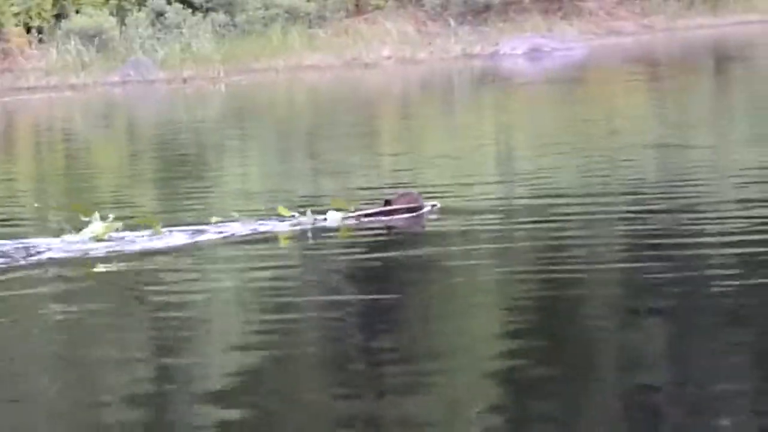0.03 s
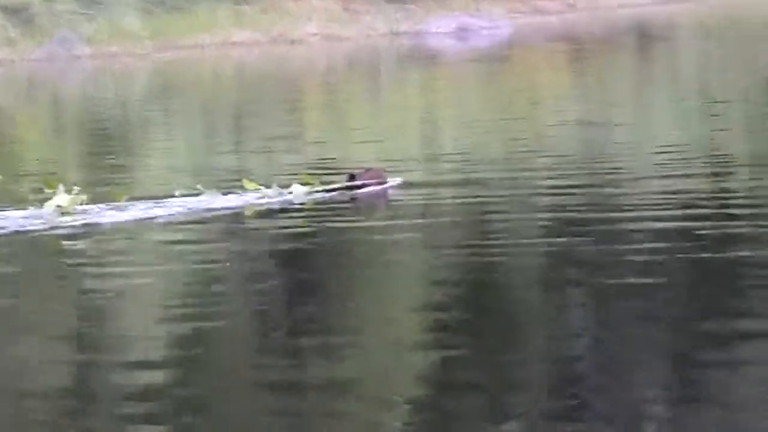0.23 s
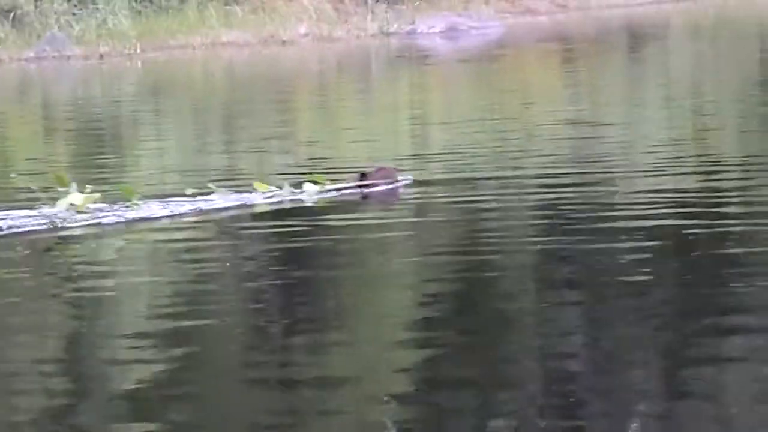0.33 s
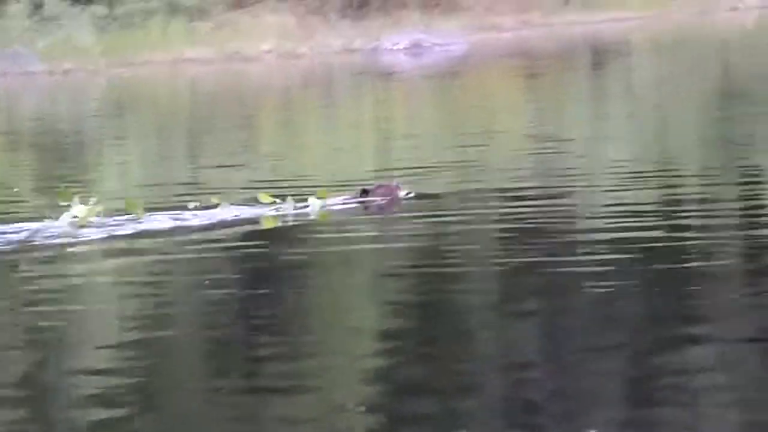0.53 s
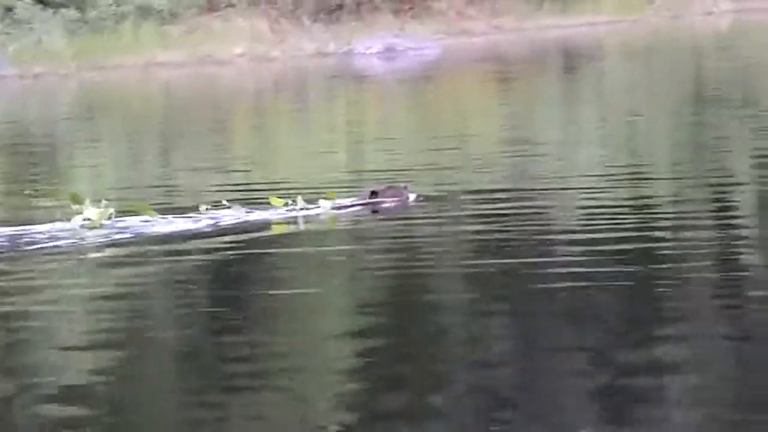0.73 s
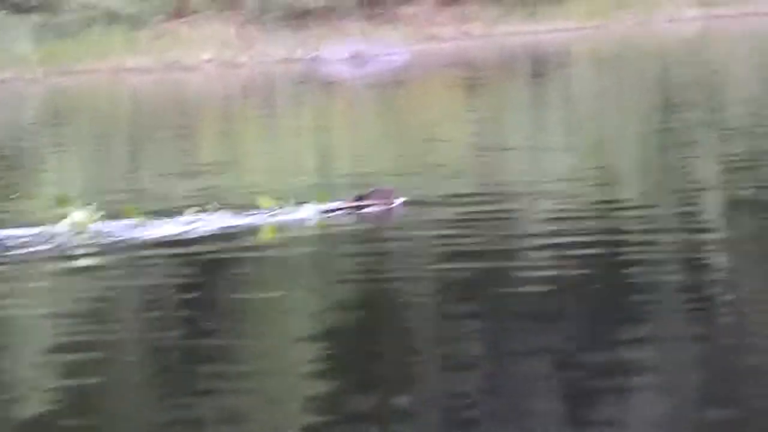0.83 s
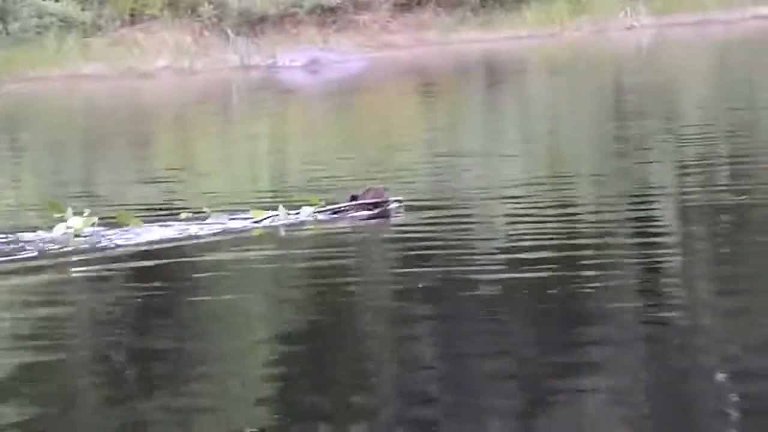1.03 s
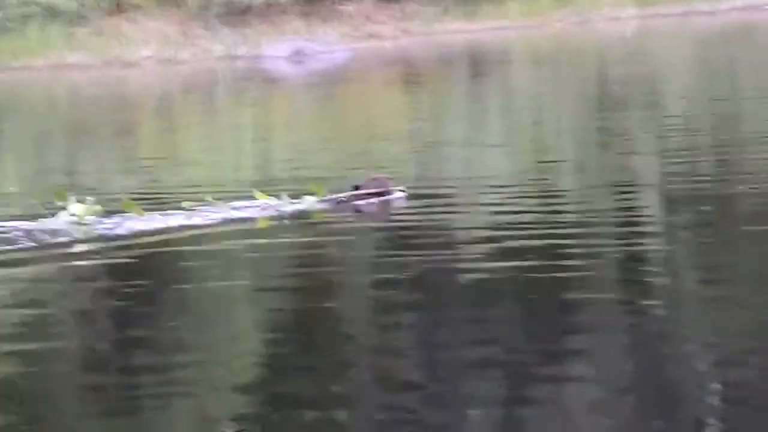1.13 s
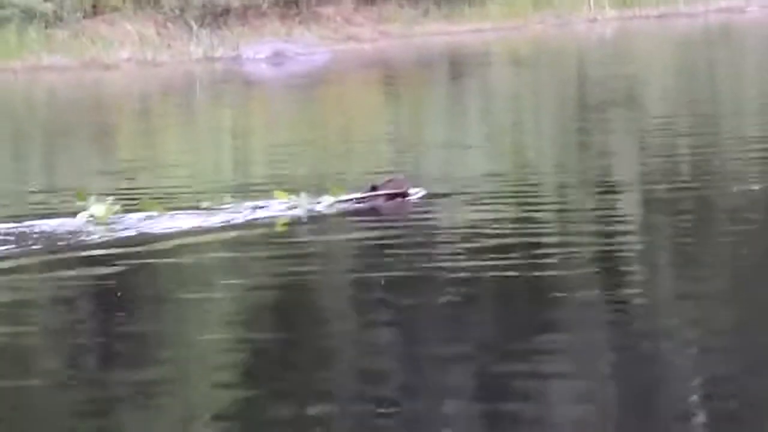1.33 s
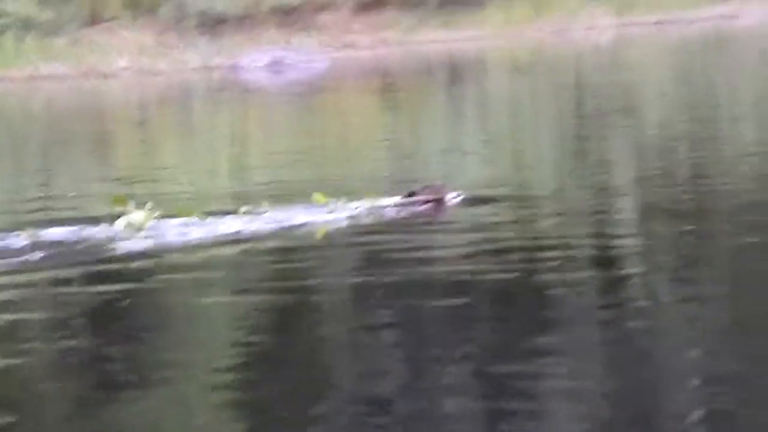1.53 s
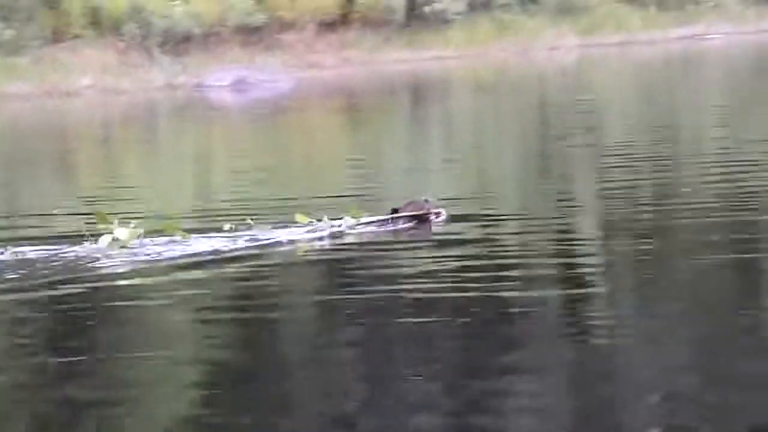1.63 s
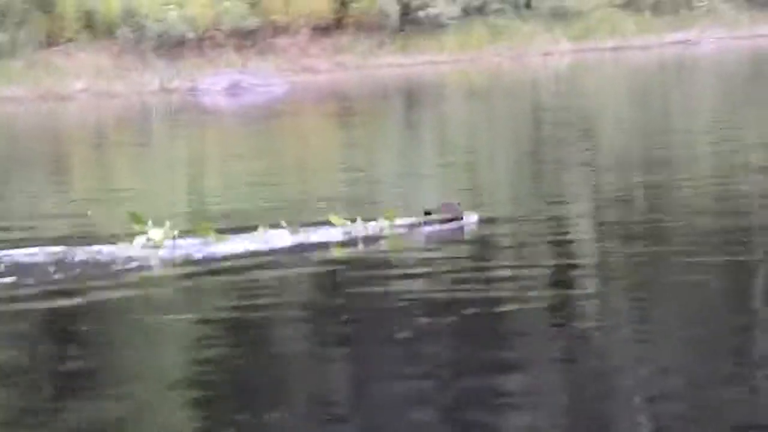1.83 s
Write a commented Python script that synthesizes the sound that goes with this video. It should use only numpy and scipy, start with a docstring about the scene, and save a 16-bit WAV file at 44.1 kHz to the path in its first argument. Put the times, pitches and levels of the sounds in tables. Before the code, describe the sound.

Two quick handling knocks close to the microphone, over soft wind and small regular ticks.

```python
"""A small tick over low wind rumble, then two sharp knocks: a hand-held camera beside a quiet pond.
The knocks and a few soft bumps of the hand thump its body and click its casing. A small mechanism,
probably the focus drive, ticks about 7.5 times a second and rings the lens barrel. Behind it: faint
dull patter, perhaps water, light gusts on the microphone and a steady hiss."""
import sys
import numpy as np
from scipy import signal
from scipy.fft import rfft, irfft
from scipy.io import wavfile

SR = 44100
rng = np.random.default_rng(int(sys.argv[2]) if len(sys.argv) > 2 else 0)


def to_wav(s):
    """Save 16-bit WAV."""
    ch = np.atleast_2d(s).T  # columns
    pcm = np.round(np.clip(ch, -1, 1) * 32767)  # PCM
    wavfile.write(sys.argv[1], SR, pcm.astype(np.int16))


N = 83790

KNOCK_HITS = [(0.2412, -12.5, 0.00072, -35), (0.2874, -14, 0.00069, -36.5)]  # blows on the body: t/s, thump peak/dB, contact/s, rattle level/dB
HAND_BUMPS = [(.169, -32.5, -40.5, 1770, -38.5), (0.2129, -27, -60, 3570, -39),
              (0.263, -26, -40, 3600, -46), (0.5611, -29, -41, 970, -37), (0.893, -30, -36, 960, -41),
              (.9393, -33, -39, 3670, -61), (1.617, -25.5, -38, 900, -42), (1.676, -30, -44, 960, -48.5)]  # soft bumps: t/s, thud peak/dB, clack level/dB, ring f/Hz, ring level/dB
CASING_CLICKS = [(.2128, -42.5, 0.015), (0.2636, -53, 0.0093), (0.2778, -33, 0.0034), (.3134, -43, 0.0036),
                 (1.212, -49, 0.013)]  # creaks: centre t/s, level/dB, length/s
FOCUS_STEPS = [(0.0212, -28.5), (0.1535, -27), (0.2863, -30), (0.4196, -28.5), (0.5523, -29.5),
               (.6858, -28), (.819, -28), (0.9519, -27.5), (1.153, -33), (1.2845, -33.5), (1.418, -34.5),
               (1.5507, -30), (1.683, -30), (1.817, -28)]  # drive stops: t/s, relative level/dB
PATTER_TICKS = [(0.5826, -46.5, 2920), (0.635, -47.5, 4200), (0.6622, -44, 1540), (0.702, -49, 1070),
                (.7645, -53, 2900), (0.901, -47, 930), (0.9185, -52, 2900), (0.9677, -46, 3130),
                (1.066, -54, 2950), (1.268, -50, 2780), (1.376, -45.5, 2640), (1.530, -45.5, 3130),
                (1.627, -46.5, 2970), (1.841, -45, 960)]  # dull ticks: t/s, level/dB, ring f/Hz
WIND_BUFFETS = [(1.299, -30, 0.0037), (1.3172, -29, 0.0026), (1.3315, -32.5, 0.0029),
                (1.357, -34.5, 0.0073), (1.3755, -36, 0.0025), (1.3925, -31.5, 0.0025),
                (1.4395, -31, 0.0057), (1.4645, -37, 0.0021), (1.5165, -32, 0.0025)]  # pressure pulses: t/s, peak/dB, length/s
# resonances: f/Hz, width/Hz, gain/dB
BODY_MODES = [(92.4, 27.6, -3.5), (176, 60, -3), (390, 250, -14)]
RATTLE_MODES = [(3540, 140, -4), (3870, 290, -18)]
BARREL_MODES = [(997, 160, 1.5), (1510, 154, 3.5), (1850, 210, -3), (2870, 660, -2.5), (3667, 217, 9.5),
                (4200, 100, -6.5)]
# noise spectra: f/Hz, relative level/dB
CASING_SPECTRUM = [(100, -37), (400, -11), (1000, -10.5), (2300, -25), (3000, -10.5), (3600, 2.5),
                   (4050, -3.5), (4800, -11), (6500, -24), (9000, -30), (14500, -36)]
CLACK_SPECTRUM = [(200, 8.5), (420, -3), (620, -18), (920, 3.5), (1270, -24), (1650, -2), (2300, -9.5),
                  (3100, -15.5), (3700, 2), (4400, -15), (5800, -22), (6600, -18), (8000, -31),
                  (14500, -33)]
PATTER_SPECTRUM = [(300, -11), (650, -4.5), (950, 7.5), (1250, 2.5), (1600, -26), (2200, -4.5), (2900, 3),
                   (3800, -3), (4600, -8.5), (6000, -22), (14000, -30)]
RUMBLE_SPECTRUM = [(12, -35), (28, -1.5), (45, -1), (85, -4.5), (130, -17), (200, -23), (300, -34),
                   (600, -44.5), (2000, -62.5)]
GUST_SPECTRUM = [(20, -7.5), (55, 0), (95, 3), (150, -0.5), (210, -7), (280, -15.5), (400, -19.5),
                 (600, -37), (1500, -57), (4000, -89)]
AIR_SPECTRUM = [(100, 8), (300, -6.5), (450, -3), (700, -9.5), (930, -2), (1270, -6), (1570, 0.5),
                (2050, -9.5), (2600, -7.5), (3200, -7), (3600, 3), (4050, -11), (4400, -12), (5000, -21.5),
                (7500, -26), (14500, -49)]
# wind envelopes: t/s, level/dB
RUMBLE_ENVELOPE = [(0, -39.5), (.11, -52), (.23, -39), (.36, -39), (.48, -46.5), (.72, -47.5), (.85, -36),
                   (.93, -50), (1.0, -53.5), (1.12, -47.5), (1.28, -66), (1.48, -41.5), (1.58, -52),
                   (1.75, -54), (1.9, -43.5)]
GUST_ENVELOPE = [(0, -64), (.36, -66), (.42, -39), (.46, -63), (.66, -50.5), (.71, -41.5), (.85, -54),
                 (.88, -31.5), (.96, -40.5), (.985, -51.5), (1.19, -44.5), (1.28, -45.5), (1.315, -40.5),
                 (1.38, -32.5), (1.415, -48.5), (1.45, -39), (1.52, -38.5), (1.55, -80), (1.9, -55.5)]

RISE_S, RING_WIDTH_HZ = 0.0012, 280
RATTLE_LAG_S = 0.00057
THUD_LEAD_S, CLACK_HOLD_S, SCUFF_GAIN_DB = 0.0024, 0.0011, -13
TICK_TOP_HZ, TICK_GAIN_DB, WHIRR_LEAD_S, WHIRR_GAIN_DB = 4280, 7.5, 0.005, -19.5
PATTER_RING_GAIN_DB, SPRINKLE_PER_S, SPRINKLE_BASE_DB, SPRINKLE_SPREAD_DB = -6.5, 30, -56.5, 3
AIR_DB, AIR_WAVER_DB, MIC_HISS_DB = -54.5, 0.6, -64.5
LOWPASS_HZ = 14400


def knocks():
    """Sudden blows ring the body's low modes; the casing rattles for a few ms."""
    out = 0
    rattle = noise(CASING_SPECTRUM) + sum(undb(db) * tone(hz, width) for hz, width, db in RATTLE_MODES)
    for start_s, thump_db, contact_s, rattle_db in KNOCK_HITS:
        age = np.clip((clock() - start_s) / contact_s, 0, 60)
        force = age ** 2 * np.exp(-age)
        out += peak(ring_modes(force, BODY_MODES), thump_db)
        envelope = burst(start_s + RATTLE_LAG_S, hold_s=0.0055, decay_s=0.0016)
        out += undb(rattle_db) * shaped(rattle, envelope)
    return out


def hand_bumps():
    """A soft, long pull on the body: low thud, dull clack, trailing scuff, brief hollow ring."""
    out, clack = 0, noise(CLACK_SPECTRUM)
    for start_s, thud_db, clack_db, ring_hz, ring_db in HAND_BUMPS:
        force = -push(start_s - THUD_LEAD_S, length_s=0.0066)
        out += peak(ring(force, hz=95.5, width_hz=47), thud_db)
        contact = burst(start_s, CLACK_HOLD_S, decay_s=0.0045)
        scuff = undb(SCUFF_GAIN_DB) * burst(start_s, hold_s=0, decay_s=0.011)
        out += undb(clack_db) * shaped(clack, contact + scuff)
        hollow = tone(ring_hz, RING_WIDTH_HZ)
        out += undb(ring_db) * shaped(hollow, burst(start_s, CLACK_HOLD_S, decay_s=0.0017))
    return out


def casing_clicks():
    """Bright creaks of the casing, each swelling and dying within ms."""
    creak = noise(CASING_SPECTRUM)
    return sum(undb(db) * shaped(creak, push(centre_s - length_s / 2, length_s))
               for centre_s, db, length_s in CASING_CLICKS)


def focus_drive():
    """Each step whirrs briefly, then stops with a tick that rings the lens barrel."""
    stops, running = np.zeros(N), np.zeros(N)
    for stop_s, db in FOCUS_STEPS:
        stops[int(stop_s * SR)] += undb(db)
        running += undb(db + WHIRR_GAIN_DB) * burst(stop_s - WHIRR_LEAD_S, hold_s=0.0028, decay_s=0.0019)
    lowpass = signal.butter(10, TICK_TOP_HZ, fs=SR, output="sos")
    ticks = signal.sosfilt(lowpass, ring_modes(stops, BARREL_MODES))
    whirr = tone(hz=3450, width_hz=170) * running
    return unit(ticks) * np.std(stops) * undb(TICK_GAIN_DB) + whirr


def patter():
    """Dull ringing ticks, perhaps water, over a random sprinkle of fainter ones."""
    def tick(start_s, db):
        return undb(db) * burst(start_s, hold_s=0.0023, decay_s=0.002)

    out, dull = 0, noise(PATTER_SPECTRUM)
    for start_s, db, ring_hz in PATTER_TICKS:
        ringing = undb(PATTER_RING_GAIN_DB) * tone(ring_hz, RING_WIDTH_HZ)
        out += shaped(dull + ringing, tick(start_s, db))
    for position, faintness in rng.random((int(SPRINKLE_PER_S * N / SR), 2)):
        db = SPRINKLE_BASE_DB - SPRINKLE_SPREAD_DB * np.log(faintness + 0.055)
        out += dull * tick(position * N / SR, db)
    return out


def wind():
    """Low rumble, brighter when a gust reaches the microphone and breaks into single buffets."""
    rumble = noise(RUMBLE_SPECTRUM) * follow(RUMBLE_ENVELOPE)
    gusts = noise(GUST_SPECTRUM) * follow(GUST_ENVELOPE)
    buffets = sum(peak(ring(-push(start_s, length_s), hz=139, width_hz=130), db)
                  for start_s, db, length_s in WIND_BUFFETS)
    return rumble + gusts + buffets


def hiss():
    """Slightly wavering air, coloured by the camera's resonances, over even microphone hiss."""
    waver = noise([(1, -6), (12, 0), (60, -40), (300, -100)])
    air = noise(AIR_SPECTRUM) * undb(AIR_DB + AIR_WAVER_DB * waver)
    return air + undb(MIC_HISS_DB) * rng.standard_normal(N)


def undb(db):
    return 10 ** (np.asarray(db) / 20)


def unit(x):
    """Scale to rms 1."""
    return x / np.sqrt(np.mean(x ** 2))


def peak(x, db):
    """Scale to a peak level."""
    return x * undb(db) / (np.abs(x).max() + 1e-12)


def clock():
    return np.arange(N) / SR


def follow(envelope):
    """Gain curve through (t/s, level/dB) points."""
    times_s, db = np.array(envelope).T
    return undb(np.interp(clock(), times_s, db))


def noise(spectrum):
    """Noise of rms 1, coloured by (f/Hz, level/dB) points."""
    hz, db = np.array(spectrum).T
    bins_hz = np.maximum(np.arange(N // 2 + 1) * SR / N, 1)
    gain = undb(np.interp(np.log(bins_hz), np.log(hz), db))
    return unit(irfft(rfft(rng.standard_normal(N)) * gain, N))


def ring(x, hz, width_hz):
    """One resonance, gain 1 at its centre."""
    return signal.lfilter(*signal.iirpeak(hz, hz / width_hz, fs=SR), x)


def ring_modes(force, modes):
    """Parallel resonances driven by one force."""
    return sum(undb(db) * ring(force, hz, width_hz) for hz, width_hz, db in modes)


def tone(hz, width_hz):
    """Narrow resonant noise of rms 1."""
    band = ring(rng.standard_normal(N), hz, width_hz)
    return unit(ring(band, hz, 2 * width_hz))


def push(start_s, length_s):
    """Smooth pulse of height 1."""
    return np.sin(np.pi * np.clip((clock() - start_s) / length_s, 0, 1)) ** 2


def burst(start_s, hold_s, decay_s):
    """Envelope: linear rise; exponential decay from hold_s after the start."""
    age_s = clock() - start_s
    return np.clip(age_s / RISE_S, 0, 1) * np.exp(-np.clip((age_s - hold_s) / decay_s, 0, 60))


def shaped(x, envelope):
    """Enveloped noise, scaled to the envelope's energy."""
    return unit(x * envelope) * np.sqrt(np.mean(envelope ** 2))


def scene():
    """Mono sum of all sources."""
    return (hiss() + wind() + knocks() + hand_bumps() + casing_clicks() + focus_drive() + patter())[None]


def record(dry):
    """Steep elliptic low-pass cuts the top treble."""
    return signal.sosfilt(signal.ellip(10, .2, 70, LOWPASS_HZ, fs=SR, output="sos"), dry)


dry = scene()
out = record(dry)
to_wav(out)
```